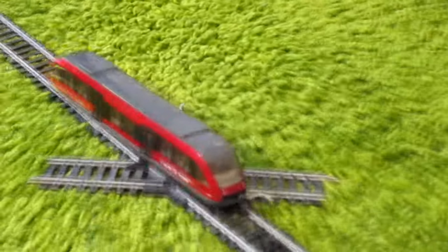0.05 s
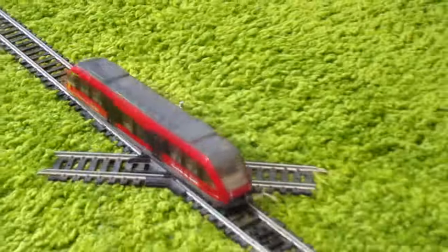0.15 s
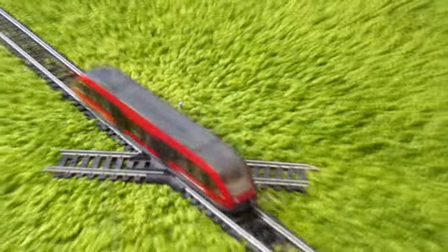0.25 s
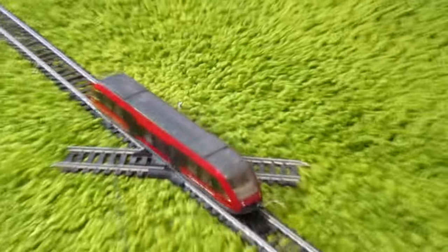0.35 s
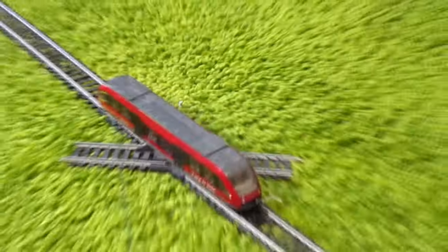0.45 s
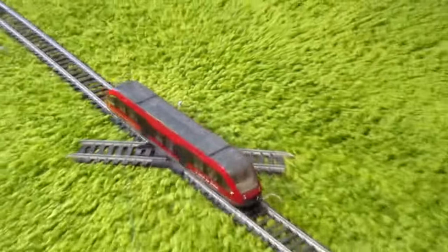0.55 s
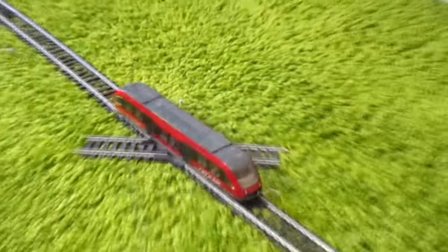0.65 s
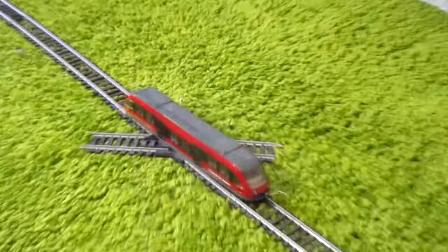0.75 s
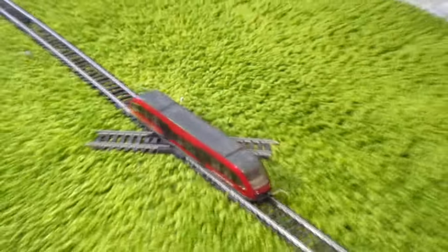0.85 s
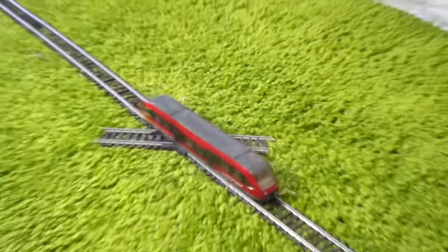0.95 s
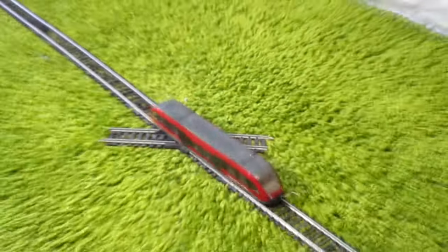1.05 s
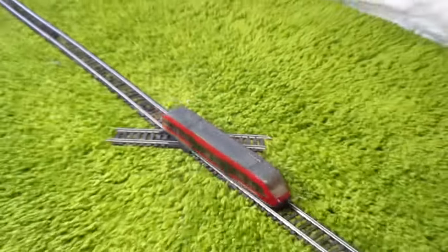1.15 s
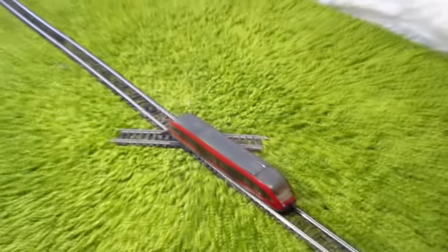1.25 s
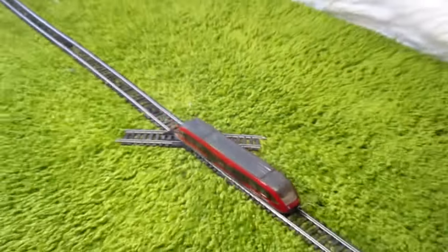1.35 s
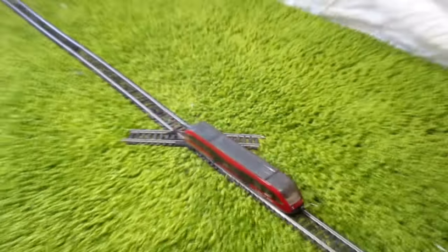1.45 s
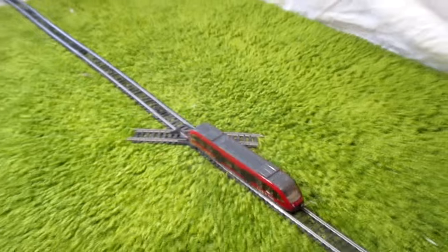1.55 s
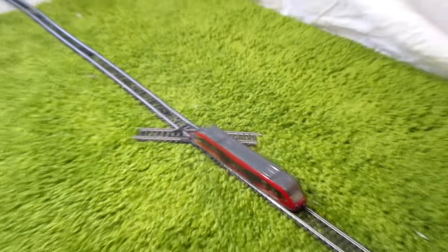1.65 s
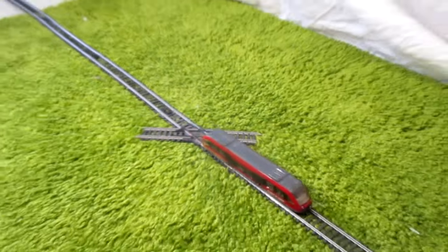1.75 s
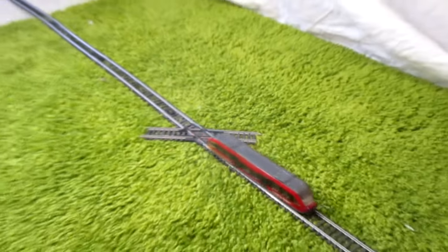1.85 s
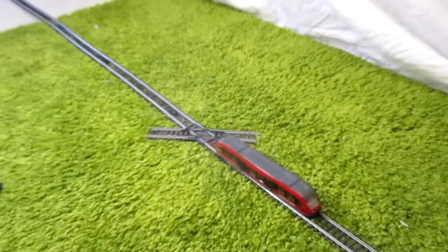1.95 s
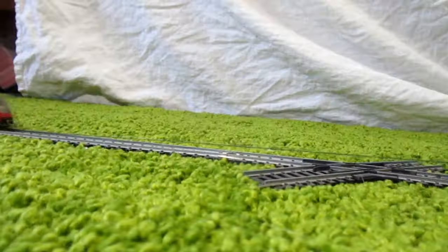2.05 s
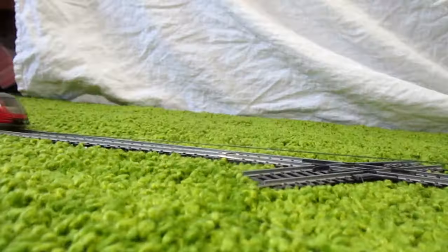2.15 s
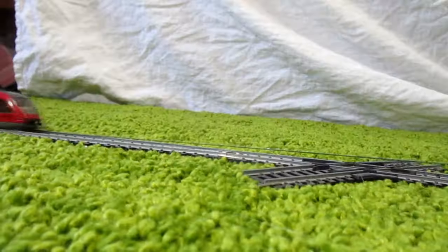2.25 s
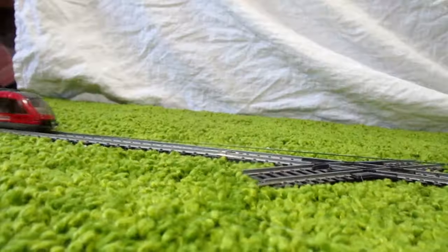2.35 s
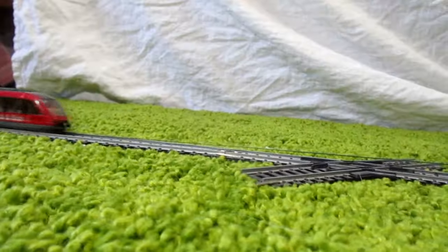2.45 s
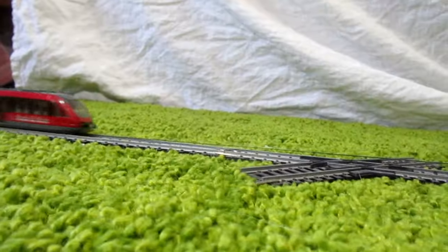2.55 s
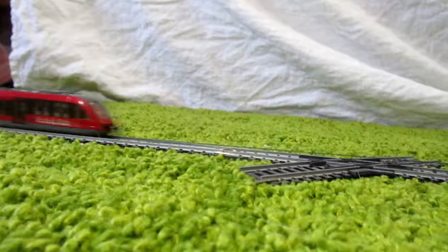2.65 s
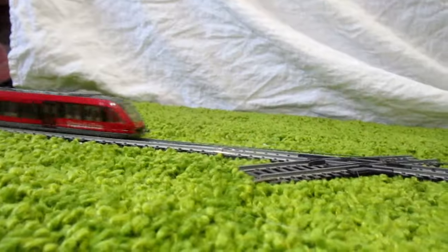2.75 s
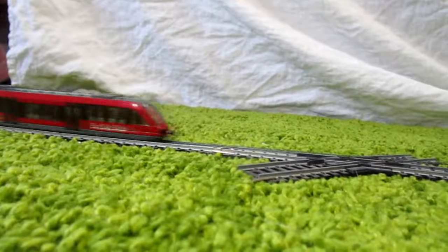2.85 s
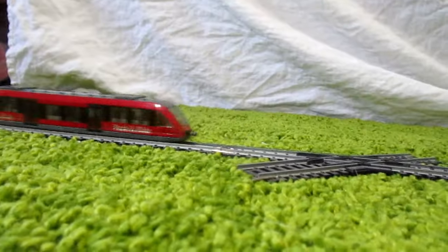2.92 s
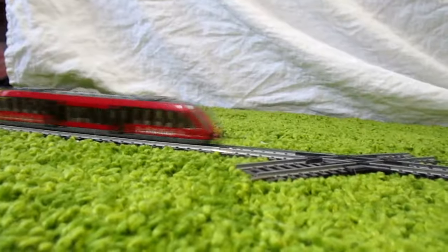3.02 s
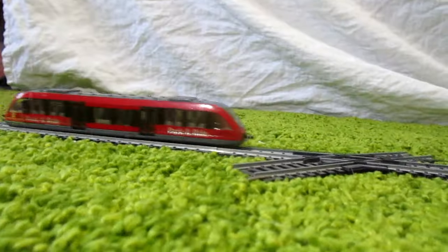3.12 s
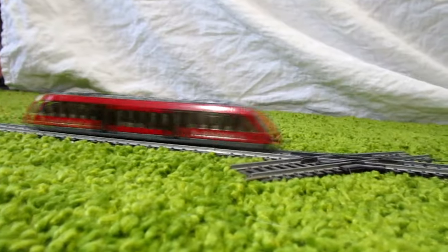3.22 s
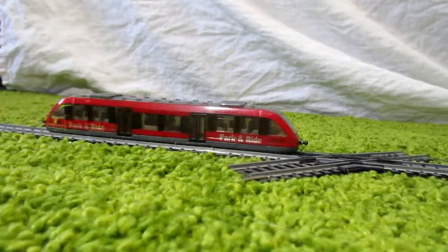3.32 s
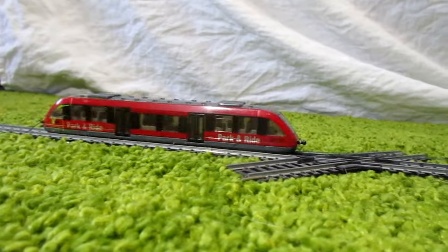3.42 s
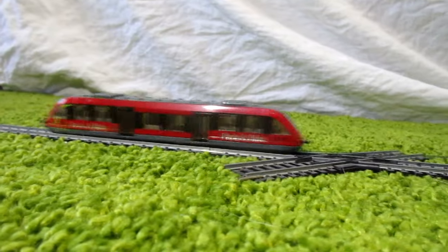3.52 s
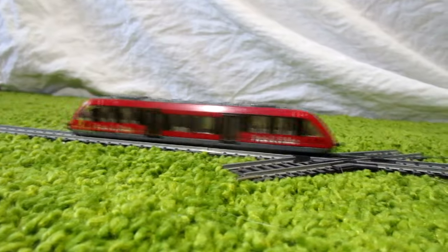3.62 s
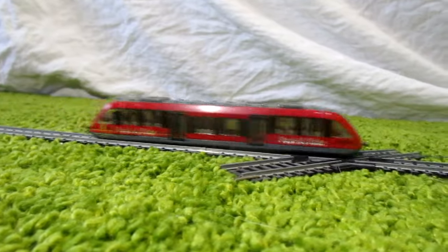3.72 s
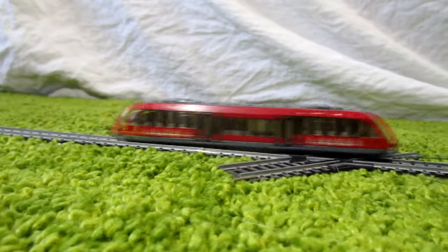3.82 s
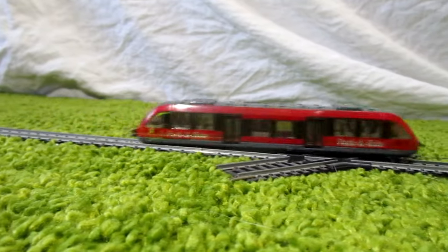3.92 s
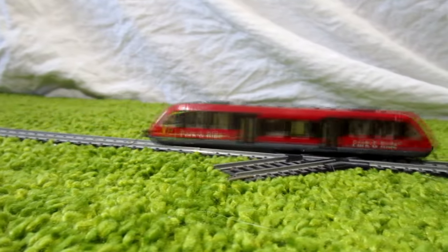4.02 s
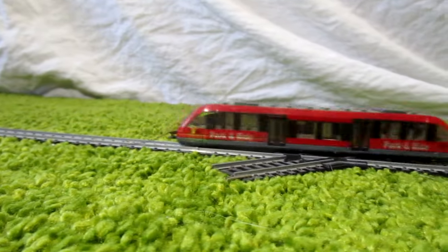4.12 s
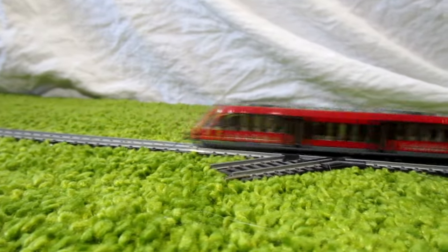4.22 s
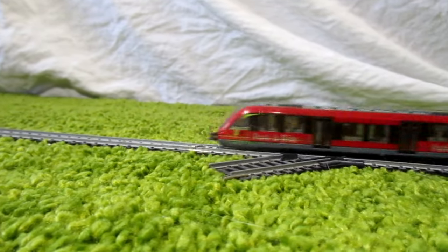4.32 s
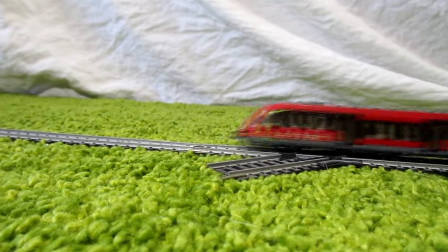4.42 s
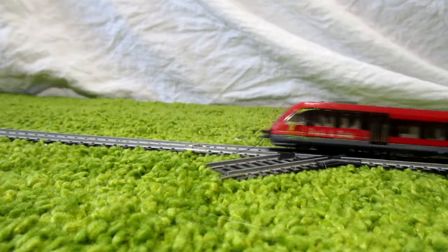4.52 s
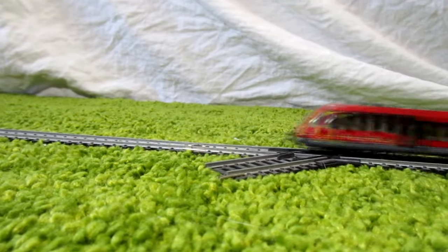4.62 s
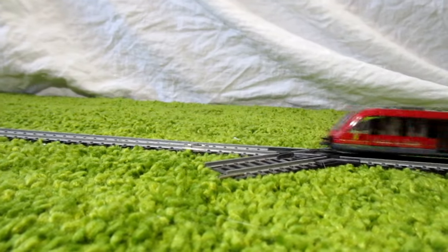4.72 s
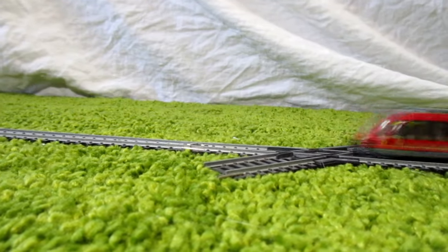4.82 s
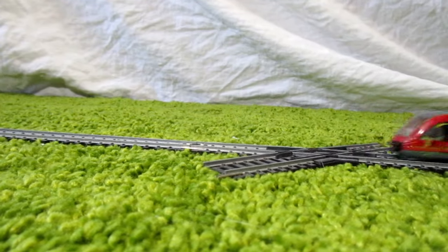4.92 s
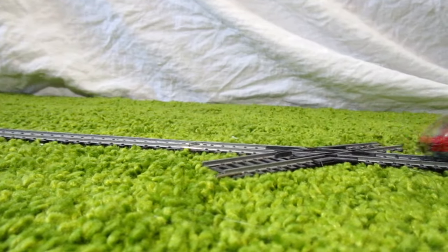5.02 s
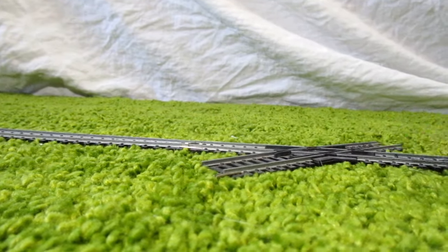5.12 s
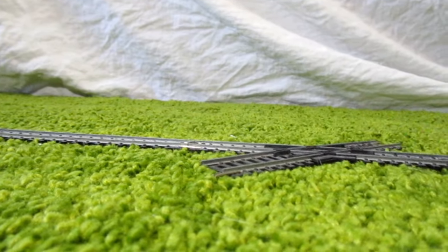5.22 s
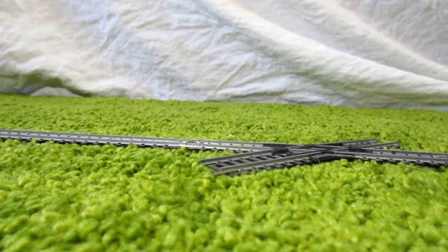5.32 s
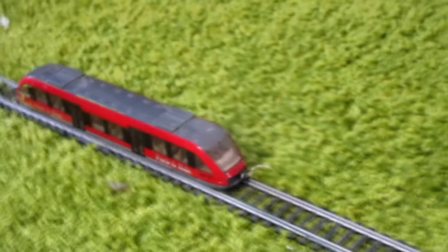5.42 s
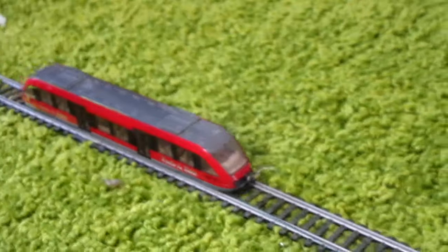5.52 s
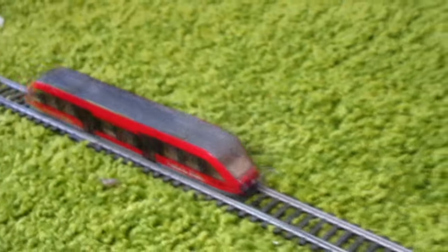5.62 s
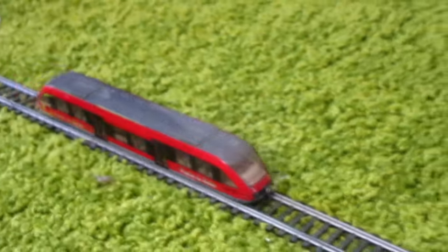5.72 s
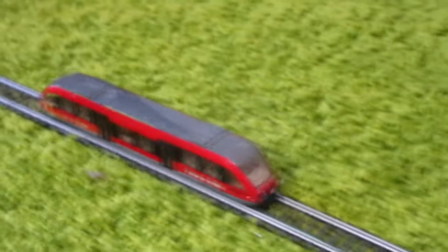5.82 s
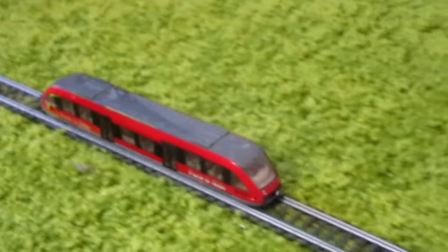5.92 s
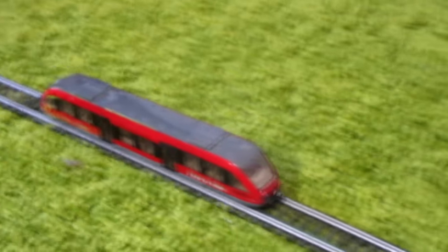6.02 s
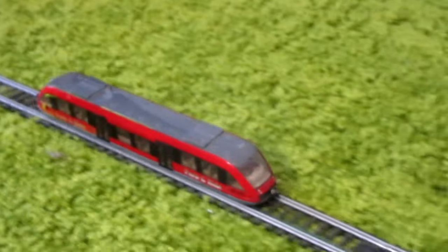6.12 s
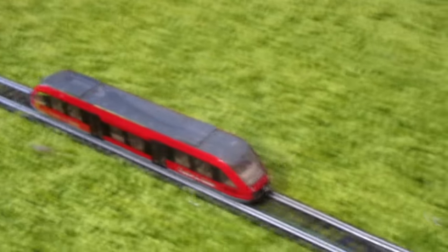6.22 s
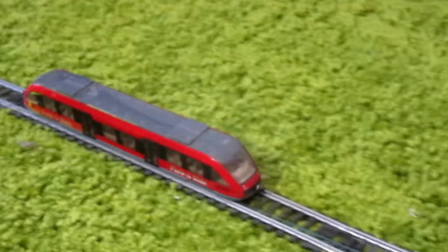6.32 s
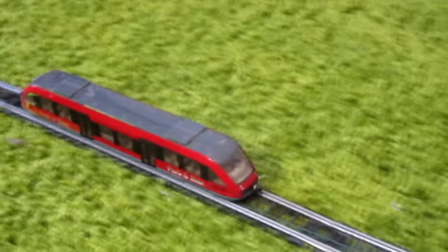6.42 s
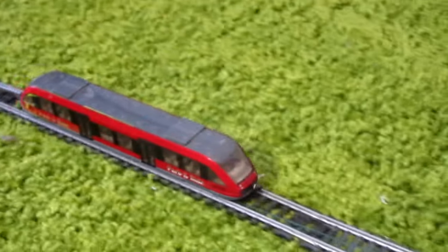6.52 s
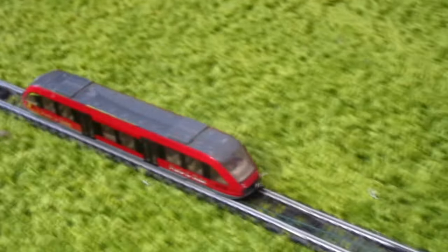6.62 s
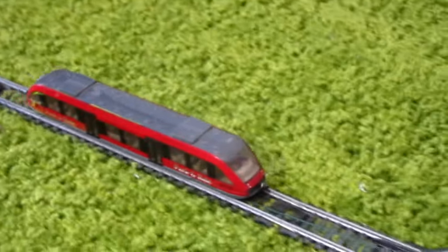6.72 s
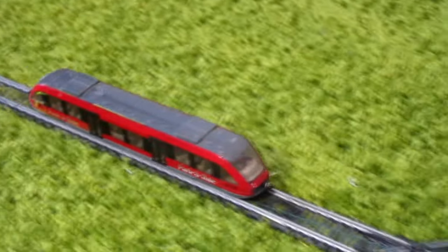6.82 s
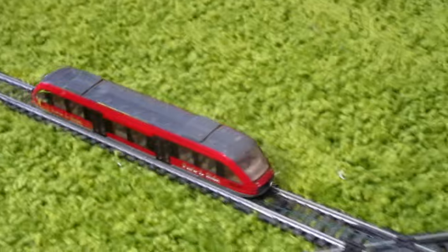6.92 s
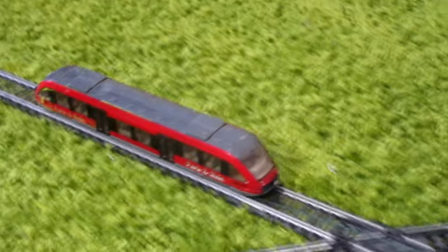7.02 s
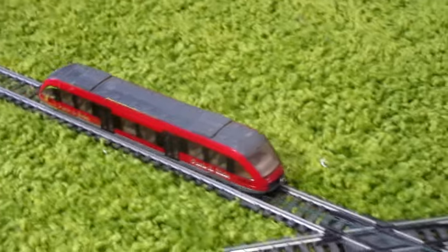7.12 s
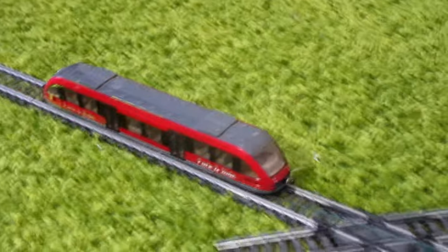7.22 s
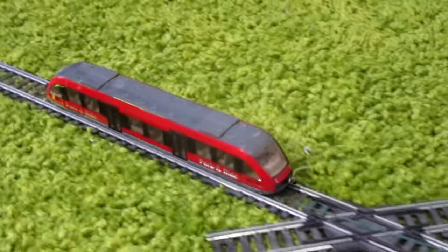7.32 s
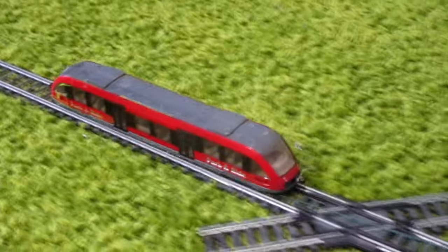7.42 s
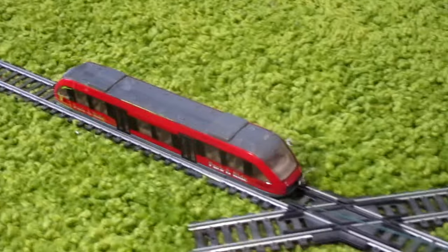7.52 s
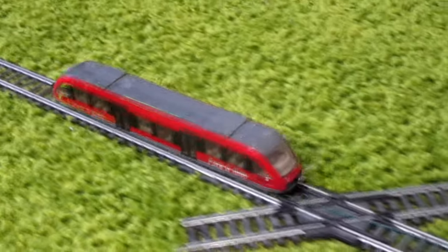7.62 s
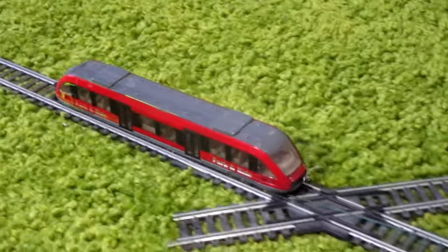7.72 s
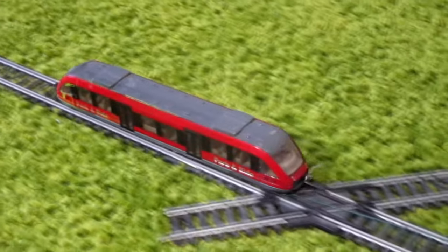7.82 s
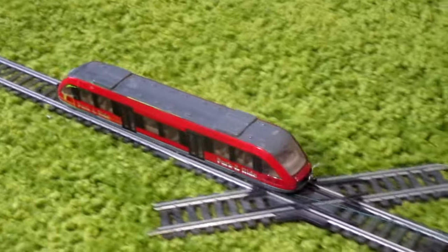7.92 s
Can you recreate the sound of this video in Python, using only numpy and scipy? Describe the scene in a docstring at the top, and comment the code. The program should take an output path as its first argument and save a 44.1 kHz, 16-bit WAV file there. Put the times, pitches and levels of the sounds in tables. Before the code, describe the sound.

A handheld microphone close to a toy railcar on a deep carpet picks up rapid soft handling thumps, then near silence. After a tiny cut, lightweight wheels chatter and click along the rails, with brief high axle chirps and two strongest snaps midway. The clatter thins and stops dead. A quieter final pass has faint rolling, tiny ticks and one firmer click in a dry, softly humming room.

```python
"""Toy railcar on deep carpet

A small railcar is pulled in jerks along plastic track, heard in three views with silent gaps between.
Wheel ticks at the rail joints are short noise bursts; rattle is dense random impacts coloured by the car.
Axles squeak as thin gliding tones and a loose metal part tinks as two decaying sines.
Dull knocks through the camera body ring its low modes; room air is filtered noise with steady hums."""
import sys
import numpy as np
from scipy import signal
from scipy.io import wavfile
from scipy.ndimage import uniform_filter1d

SR = 44100
rng = np.random.default_rng(int(sys.argv[2]) if len(sys.argv) > 2 else 0)


def generate_wav(sig):
    """Save sig (samples, or channels by samples) to the path in sys.argv[1] as 16-bit PCM at SR."""
    pcm = np.round(np.clip(np.atleast_2d(sig).T, -1, 1) * 32767).astype(np.int16)
    wavfile.write(sys.argv[1], SR, pcm)


N = 351036

# views: start t/s, end t/s, microphone housing dip f/Hz, dip width/Hz, dip depth/dB, room air level/dB
VIEW_ROWS = [(0, 2.019, 4080, 500, -13, -51), (2.04, 5.199, 4850, 350, -7.5, -51),
             (5.531, 7.97, 4800, 350, -8, -51.5)]
# spectrum of the bright snap of a hard contact: f/Hz, relative level/dB
SNAP_SPECTRUM = [(4300, -22), (5200, -3), (6200, 1), (8000, 2.5), (10000, -6), (13000, -1.5), (15500, -18)]
# spectrum of the hollow body sound: f/Hz, relative level/dB
HOLLOW_SPECTRUM = [(500, -23), (800, -1), (1600, 3), (2400, 0.5), (3300, -3.5), (4400, 0), (5500, -50.5)]


def amp(db):
    """Amplitude factor of a level in dB."""
    return 10 ** (np.asarray(db) / 20)


def evened(x):
    """Scale to rms 1."""
    return x / np.sqrt(np.mean(x ** 2) + 1e-20)


def peaked(x):
    """Scale to peak 1."""
    return x / abs(x).max()


def read(points, hz):
    """Read a spectrum between its points, along a log frequency axis."""
    f, value = np.transpose(points)
    return np.interp(np.log(hz + 1), np.log(f + 1), value)


def add(mix, s, sound):
    """Add a sound to the mix from s seconds on, cut at the end of the mix."""
    part = mix[round(s * SR):][:len(sound)]
    part += sound[:len(part)]


def colour(x, spectrum, modes=()):
    """Causal filter of energy 1: a broad spectrum with resonant bumps or dips."""
    hz = abs(np.fft.fftfreq(8192, 1 / SR))
    bumps = sum(db / (1 + (2 * (hz - f) / width) ** 2) for f, width, db in modes)
    log_gain = np.log(amp(read(spectrum, hz) + bumps))
    # minimum phase: the phase follows from the log gain
    response = np.exp(log_gain - 1j * signal.hilbert(log_gain).imag)
    taps = np.fft.ifft(response).real[:4096]
    return signal.oaconvolve(x, taps / np.linalg.norm(taps))[:len(x)]


def slow(count, hz):
    """Random drift of rms 1: noise low-passed at hz."""
    return evened(signal.lfilter(*signal.butter(1, hz, fs=SR), rng.standard_normal(count)))


def tinted(noise, hz, share, sharp):
    """Noise that favours one patch of the spectrum, as an impact on one part does."""
    patch = signal.lfilter(*signal.iirpeak(hz, sharp, fs=SR), noise)
    return noise + share * evened(patch)


def wheels():
    """Ticks at the joints and the rattle between them drive the same shell, rails and carpet."""
    # carpet rumble spectrum: f/Hz, relative level/dB
    rumble_spectrum = [(25, -20), (55, 0), (90, 2.5), (200, -4.5), (500, -7), (750, -11), (1100, -42)]
    # modes of car shell and rails: f/Hz, width/Hz, level above their surroundings/dB
    shell_modes = [(531, 89, 5), (1600, 60, 4), (2256, 45, 3.5), (3460, 680, 6.5), (5950, 200, 4),
                   (8500, 330, 2), (9660, 200, 4.5)]
    # how strongly a tick thumps through the carpet, one per view: level/dB against its hollow body
    thump_db = [4, -1, -3.5]

    bright, hollow = wheel_ticks()
    t = np.arange(N) / SR
    thump = sum(amp(db) * (t >= view[0]) * (t < view[1]) for view, db in zip(VIEW_ROWS, thump_db))
    low = hollow * thump
    rolling_bright, rolling_hollow, rolling_low = pulled_rattle()
    bright = colour(bright + rolling_bright, SNAP_SPECTRUM, shell_modes)
    hollow = colour(hollow + rolling_hollow, HOLLOW_SPECTRUM, shell_modes)
    return bright + hollow + colour(low + rolling_low, rumble_spectrum, shell_modes)


def wheel_ticks():
    """A wheel scrapes up to the joint, strikes, then loose parts settle in lumps."""
    # ticks, levels before the filters: t/s (strike 1 ms later), bright snap peak level/dB,
    # hollow body level/dB against it, [share of scrape and settling left, 0-1; all of it if absent]
    tick_rows = [(0.7667, -29, -16), (0.835, -39, 0), (1.0256, -35, -8), (1.0725, -33, 4, .3),
                 (1.1615, -45, 12, .4), (2.531, -37, 1), (2.5583, -33, 0, .5), (2.597, -33, -4),
                 (2.6205, -30, -2), (2.6416, -28, -1.5), (2.666, -27.5, -7), (2.6932, -29, -1.5),
                 (2.7045, -28, -2), (2.7628, -29, -28), (2.797, -24.5, -10, .5), (2.8379, -31, -8, .5),
                 (2.848, -32, 1), (2.8714, -29, -9.5), (2.886, -30, -5), (2.911, -32, 3),
                 (2.9403, -23, -4.5), (2.9836, -30, 2), (3.051, -34, -23), (3.113, -23, -11),
                 (3.151, -40.5, 13), (3.171, -29, 5, .6), (3.194, -28, -3), (3.239, -28, 0),
                 (3.2863, -21.5, -4), (3.3054, -22, 0, .6), (3.3249, -23.5, -3), (3.5777, -25.5, -5),
                 (3.683, -26.5, 0.5), (3.7239, -24.5, 2), (3.743, -22, -5), (3.7514, -12, -6, .7),
                 (3.7912, -23, -6), (3.8144, -18, -6.5), (3.8288, -25.5, -3), (3.844, -25, 1),
                 (3.8863, -25.5, -4), (3.9479, -17, -5.5), (3.977, -8, -8), (4.045, -30.5, 2.5),
                 (4.0758, -20, -1.5), (4.1128, -5, -11, .35), (4.2199, -25, -9), (4.319, -30, -1),
                 (4.409, -26, -5), (4.519, -30, -2), (4.5279, -22, -6.5, .6), (4.536, -25, -5),
                 (4.562, -30, -3, .6), (4.6059, -18, -18, .5), (4.635, -28, -10, .4), (4.6478, -20, -1.5),
                 (4.7087, -25.5, -25), (4.751, -34, -2), (4.783, -29, -3.5), (4.8763, -30, 2, .6),
                 (4.9083, -31, 0), (4.9876, -27, -1), (5.024, -33, -1.5), (5.0764, -29, -23),
                 (5.7655, -29, 4.5, .4), (5.813, -39, 4), (5.867, -35, 3), (5.976, -36, -5),
                 (5.9821, -28, -3, .7), (6.0908, -43.5, 8.5), (6.775, -39, 2.5), (7.0831, -39, 4.5),
                 (7.1531, -42, 7), (7.199, -34.5, 3), (7.2924, -34, 5), (7.308, -36, 5), (7.321, -35, 1),
                 (7.372, -36, 7), (7.393, -32, -8, .5), (7.494, -30, -2, .6), (7.5372, -34, 4),
                 (7.6072, -23, 0, .7)]
    scrape_share, scrape_t60_s, tint = 0.33, 0.024, 0.4

    bright, hollow, t = np.zeros(N), np.zeros(N), np.arange(-.006, .09, 1 / SR)
    for s, db, body_db, *left in tick_rows:
        bright_noise, hollow_noise, lump_noise = rng.standard_normal((3, len(t)))
        bright_spot, hollow_spot = rng.random(2)
        lumps = np.prod(left) * amp(2.1 * evened(uniform_filter1d(lump_noise, 60)))
        hard = np.clip((db + 58.5) / 35, .1, 1)  # strong blows shake the car for longer
        settling = 0.31 * lumps * amp(-60 * t / (0.026 + 0.06 * hard))
        after = amp(-60 * t / 0.004) + settling
        scrape = scrape_share * np.prod(left) * lumps * amp(60 * t / scrape_t60_s)
        shape = np.where(t < 0, scrape, after)
        snap = shape * tinted(bright_noise, 5900 + 4600 * bright_spot, tint, sharp=4.9)
        body = shape * tinted(hollow_noise, 1400 + 2300 * hollow_spot, tint, sharp=6.9)
        add(bright, s - .005, amp(db) * peaked(snap))
        add(hollow, s - .005, amp(db + body_db) * peaked(body))
    return bright, hollow


def pulled_rattle():
    """While the car is pulled, shared impacts rattle shell and rails and rumble in the carpet."""
    # pulls, levels before the filters: start t/s, end t/s, hollow rattle level/dB at the start, at the end,
    # bright rattle level/dB against it, carpet rumble level/dB against it
    pull_rows = [(0.704, 1.463, -64, -68, -5, 10), (2.01, 2.52, -64, -68.5, 0, 10),
                 (2.5, 2.724, -60, -54, -0.5, 5), (2.696, 3.275, -52.5, -51.5, -2.5, 4),
                 (3.253, 3.342, -53.5, -41, -2, 7), (3.522, 3.658, -51, -56, -4, 1.5),
                 (3.67, 4.201, -50, -60.5, -0.5, 9.5), (4.194, 4.412, -52, -60.5, 3, 7.5),
                 (4.42, 5.204, -54.5, -61, 1, 8), (5.512, 5.804, -66, -65, -4.5, 3),
                 (5.83, 5.92, -56, -53, -1, 1), (5.905, 6.116, -65, -69, -1, 5),
                 (6.456, 6.598, -58.5, -70, -2, -2), (6.58, 7.145, -63.5, -71.5, -2, -1),
                 (7.208, 7.436, -62, -62.5, -2, 8.5), (7.467, 7.678, -61, -60.5, -4, 10)]
    start_stop_s = 0.023

    bright, hollow, low, t = np.zeros(N), np.zeros(N), np.zeros(N), np.arange(N) / SR
    shared = impacts()
    shell = rattle(shared, 1128, 3880, 0.044, count=4)
    rails = rattle(shared, 6000, 12000, 0.007, count=5)
    # the carpet rumbles along with the smoothed strength of the shell
    carpet = evened(np.sqrt(uniform_filter1d(abs(shell), 600)) * rng.standard_normal(N))
    for start, end, from_db, to_db, bright_db, low_db in pull_rows:
        on = np.clip(np.minimum(t - start, end - t) / start_stop_s, 0, 1)
        level = on * amp(np.interp(t, (start, end), (from_db, to_db)))
        hollow += level * shell
        bright += level * rails * amp(bright_db)
        low += level * carpet * amp(low_db)
    return bright, hollow, low


def rattle(shared, low_hz, high_hz, t60, count):
    """Small impacts: some shake every part, others one loose part with its own patch of spectrum."""
    t, out = np.arange(2000) / SR, np.zeros(N)
    bump = (1 - np.exp(-t / 0.0003)) * amp(-60 * t / t60)
    for hz in np.geomspace(low_hz, high_hz, count):
        hits = signal.oaconvolve(shared + 0.81 * impacts(), bump)[:N]
        part = tinted(rng.standard_normal(N), hz, 1.3, sharp=7)
        out += np.sqrt(evened(hits) ** 2 + .06) * part  # .06 keeps a faint hiss between hits
    return evened(out)


def impacts():
    """Random clicks, about 145 a second, a few of them large."""
    size_db = 4.5 * np.minimum(rng.exponential(1, N), 3.5)
    return (rng.random(N) < 145 / SR) * amp(size_db)


def squeaks():
    """Stick-slip of an axle: a thin tone arches in pitch, both wheels fluttering a little apart."""
    # slips: start t/s, length/s, pitch f/Hz at the start, at the end, extra rise midway/Hz (negative sags),
    # level/dB at the start, at the end (before arch and flutter)
    slip_rows = [(2.042, 0.0092, 9100, 9900, 400, -35, -21), (2.117, 0.05, 6600, 6730, 0, -52, -37),
                 (2.164, 0.016, 9250, 9240, 0, -34.5, -50), (2.213, .018, 10270, 10000, 0, -30.5, -30.5),
                 (2.234, 0.045, 10240, 10220, -400, -35, -31.5), (2.4, 0.025, 9640, 8900, 897, -29, -32),
                 (2.442, 0.031, 9420, 10060, -100, -32, -35.5), (2.51, 0.01, 6300, 6500, 0, -41, -39),
                 (3.856, 0.063, 8700, 8100, 2496, -33, -25), (3.936, 0.011, 9200, 9900, 0, -34, -36),
                 (4.469, 0.005, 9600, 9600, 0, -38, -40), (4.494, 0.0082, 9540, 9600, 0, -25.5, -42),
                 (4.688, 0.015, 9500, 9250, 0, -30.5, -35), (4.705, .048, 9700, 9600, 1100, -34, -36),
                 (4.783, 0.027, 9340, 9000, 1894, -32, -30.5), (5.118, .022, 9200, 9000, 900, -25, -29),
                 (5.14, 0.052, 8900, 9400, 602, -29, -49), (5.984, .013, 4600, 7000, 500, -44, -44),
                 (6.185, 0.06, 8300, 7940, 0, -43.5, -41.5), (6.248, 0.064, 9170, 8900, 96, -44.5, -51)]
    arch_softer_db_per_khz = 5.5
    # per wheel: level/dB, share by which its pitch strays midway
    wheel_pair = (0, 0), (-6.5, -0.041)

    out = np.zeros(N)
    for start, length, from_hz, to_hz, arch_hz, from_db, to_db in slip_rows:
        t = np.arange(0, length, 1 / SR)
        u = t / length
        arch = arch_hz * (1 - abs(2 * u - 1) ** 3.0)
        edge = np.clip(np.minimum(t / .0009, (length - t) / 0.0022), 0, 1)
        level_db = from_db + (to_db - from_db) * u
        level_db = level_db - arch_softer_db_per_khz * np.maximum(arch, 0) / 1000
        for wheel_db, apart in wheel_pair:
            wobble, flutter = smooth_noise(len(t)), smooth_noise(len(t))
            stray = 1 + apart * np.sin(np.pi * u) + 0.014 * wobble
            pitch = (from_hz + (to_hz - from_hz) * u + arch) * stray
            tone = np.sin(2 * np.pi * np.cumsum(pitch) / SR)
            add(out, start, amp(level_db + wheel_db + 3.2 * flutter) * edge * tone)
    return out


def smooth_noise(count):
    """Flutter of a squeak: noise averaged twice over 90 samples."""
    once = uniform_filter1d(rng.standard_normal(4000), 90)
    return evened(uniform_filter1d(once, 90))[:count]


def tinks():
    """A loose metal part: each tiny tink rings two high modes."""
    # tinks: t/s, peak level/dB
    tink_rows = [(.197, -46), (.326, -46), (1.022, -41), (1.132, -45), (5.855, -42), (5.886, -43)]
    # modes of the part: f/Hz, level/dB, t60/s
    metal_modes = [(12050, 0, .04), (13300, 0, .006)]

    t, out = np.arange(3000) / SR, np.zeros(N)
    ring = sum(amp(db - 60 * t / t60) * np.sin(2 * np.pi * hz * t) for hz, db, t60 in metal_modes)
    for s, db in tink_rows:
        add(out, s, amp(db) * peaked(ring))
    return out


def echo(x, t60):
    """Short dry room: sparse taps of random sign that die away."""
    taps = np.zeros(SR // 2)
    at = np.arange(150, len(taps) - 20, 20)
    taps[at + rng.integers(0, 20, len(at))] = rng.choice([-1., 1.], len(at))
    taps *= amp(-60 * np.arange(len(taps)) / SR / t60)
    return signal.oaconvolve(x, taps / np.linalg.norm(taps))[:N]


def knocks():
    """A soft blow and its rebound ring the low modes of the camera body; a thin tick rides on it."""
    # knocks: t/s, dull peak level/dB, sharp tick level/dB against it (before the tick's filters)
    knock_rows = [(0.007, -21.5, -2.5), (0.058, -19.5, -4), (0.096, -21.5, -3), (0.142, -20, -12),
                  (0.187, -23, -10.5), (0.229, -20.5, -6), (0.262, -22, -3.5), (0.289, -32, -6),
                  (0.318, -33, -9), (0.355, -33, -12), (0.385, -27.5, -4), (0.411, -31.5, -4.5),
                  (0.441, -33, -26), (0.474, -30, -14), (0.506, -30.5, -24), (0.546, -29, -13),
                  (0.589, -32, 7), (0.613, -31.5, -22), (0.651, -36, -31), (0.687, -35, -22),
                  (0.7225, -28.5, 0.5), (0.753, -33, 3), (0.996, -35, -29), (1.031, -34, -18),
                  (1.065, -31, -20), (1.244, -27, -38), (3.305, -26, -12), (3.322, -27, -10),
                  (4.197, -38, -10), (4.218, -32, -25), (4.256, -29, -25), (4.603, -32.5, -25),
                  (4.711, -36, -25)]
    # modes of the camera body: f/Hz, level/dB, t60/s without the hand
    case_modes = [(243, 6, 0.028), (381, 5.5, 0.028), (488, 1, 0.024), (620, 12.5, 0.045), (1000, 9, 0.027)]
    grip_s = 0.027  # the hand takes a further 60 dB off the ring within this time
    soft_dulls = 0.25  # dB per octave that the ring darkens for each dB a knock falls under -23 dB
    tick_lag_s = 0.0035

    t, dull, ticks = np.arange(3000) / SR, np.zeros(N), np.zeros(N)
    # the case gives, then springs back
    push = np.exp(-((t[:200] - .002) / 0.0004) ** 2) - .45 * np.exp(-((t[:200] - .001) / .0006) ** 2)
    for s, db, tick_db in knock_rows:
        draw = rng.standard_normal(400)  # chance for this knock's modes and rebound, and its tick noise
        ring = np.zeros(len(t))
        for k, (f, mode_db, t60) in enumerate(case_modes):
            tilt_db = soft_dulls * min(db + 23, 0) * np.log2(f / 370)
            level = amp(mode_db + tilt_db + 1.5 * draw[k] - 60 * t / t60)
            ring += level * np.sin(2 * np.pi * f * (1 + 0.04 * draw[9 + k]) * t)
        ring = np.convolve(push, ring * amp(-60 * (t / grip_s) ** 2))
        rebound_s = 0.0044 + 0.0007 * draw[20]
        ring = ring + 0.8 * np.roll(ring, round(SR * rebound_s))
        add(dull, s, amp(db) * peaked(ring))
        tick = draw * amp(-60 * t[:400] / 0.01)
        add(ticks, s + tick_lag_s, amp(db + tick_db) * peaked(tick))
    return dull + colour(ticks, HOLLOW_SPECTRUM) + amp(-6.5) * colour(ticks, SNAP_SPECTRUM)


def room_air():
    """Soft air noise of each view, with thin tones that waver a little."""
    # air spectra of the first view and of the later ones: f/Hz, relative level/dB per Hz
    air_first = [(25, -14.5), (60, -1.5), (130, -6), (330, -8.5), (560, -18), (780, -28), (950, -21.5),
                 (1900, -24.5), (2800, -26), (7000, -28), (10000, -27), (13400, -33), (16000, -42)]
    air_later = [(25, -7), (60, 4), (130, 0.5), (300, -7), (520, -11.5), (720, -22), (1100, -18),
                 (1900, -13.5), (4000, -23.5), (7800, -22), (11000, -27), (16000, -39)]
    # fuzzy bands in that air: f/Hz, width/Hz, level above their surroundings/dB
    bands_first = [(3560, 200, 10), (5160, 200, 6), (11000, 700, 7), (12950, 500, 7)]
    bands_later = [(887, 180, 18.7), (3500, 100, 4.9)]
    # steady tones: f/Hz, peak level/dB before wavering
    hum_rows = [(129, -55), (377, -57.5), (1906, -67.5), (1906, -61), (7881, -61)]
    # when each tone sounds: start t/s, end t/s
    hum_times = [(0, 5.2), (2.03, 8), (0, 2.03), (5.5, 6.8), (6.06, 8)]

    t, out = np.arange(N) / SR, np.zeros(N)
    first, later = (air_first, bands_first), (air_later, bands_later)
    for (start, end, *_, db), air in zip(VIEW_ROWS, (first, later, later)):
        on = (t >= start - .01) * (t < end + .01)
        out += amp(db) * colour(rng.standard_normal(N), *air) * on
    for (start, end), (hz, db) in zip(hum_times, hum_rows):
        phase = 2 * np.pi * hz * t + 0.39 * slow(N, 6)
        out += amp(db + 1.3 * slow(N, 4.1)) * np.sin(phase) * (t >= start) * (t < end)
    return out * amp(1.4 * slow(N, 1.0))


def scene():
    """The train and its faint echo, the knocks on the camera body and the room behind."""
    train = wheels() + squeaks() + tinks()
    return (train + amp(-15.5) * echo(train, 0.12) + knocks() + room_air())[None]


def record(dry):
    """The microphone housing cuts a narrow dip set for each view; silence between views; band limit."""
    edge_hz = 16450
    t, out = np.arange(N) / SR, np.zeros(N)
    flat = [(20, 0), (SR / 2, 0)]
    for start, end, hz, width, dip_db, _ in VIEW_ROWS:
        gate = np.clip(np.minimum(t - start, end - t) / 0.00043, 0, 1)
        out += gate * colour(dry[0], flat, [(hz, width, dip_db)])
    low_pass = signal.firwin(511, edge_hz, window=("kaiser", 9), fs=SR)
    return signal.oaconvolve(out, low_pass, "same")[None]


dry = scene()
out = record(dry)
generate_wav(out)
```